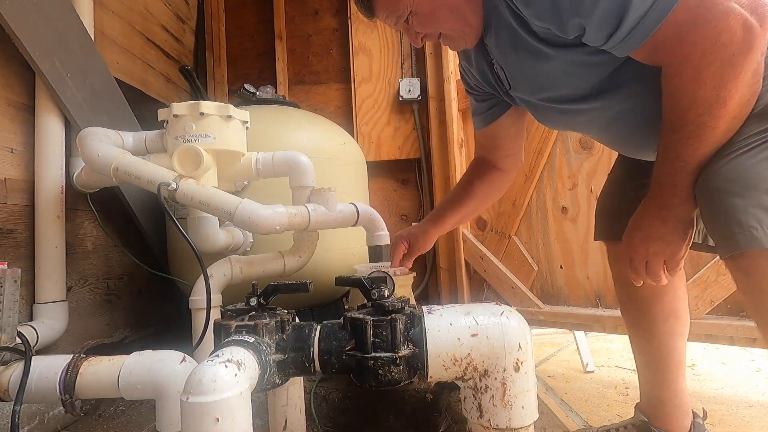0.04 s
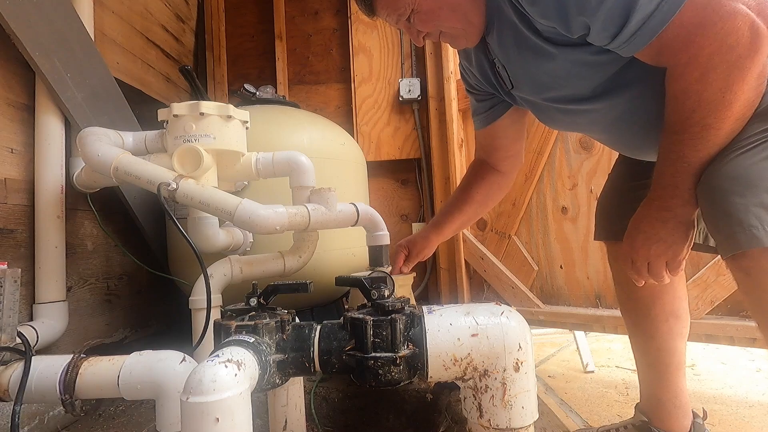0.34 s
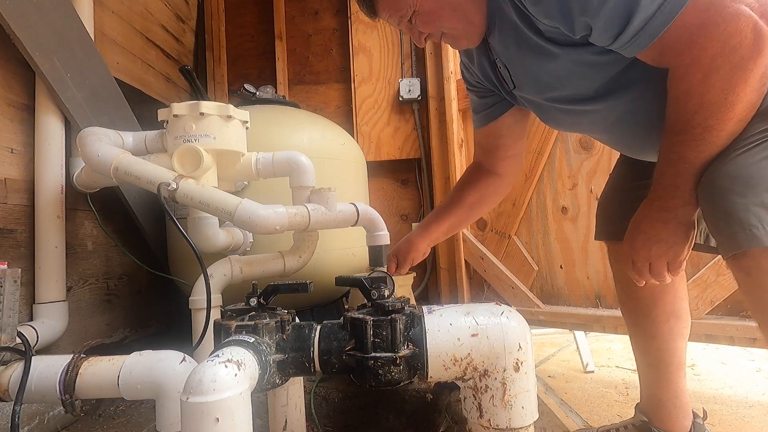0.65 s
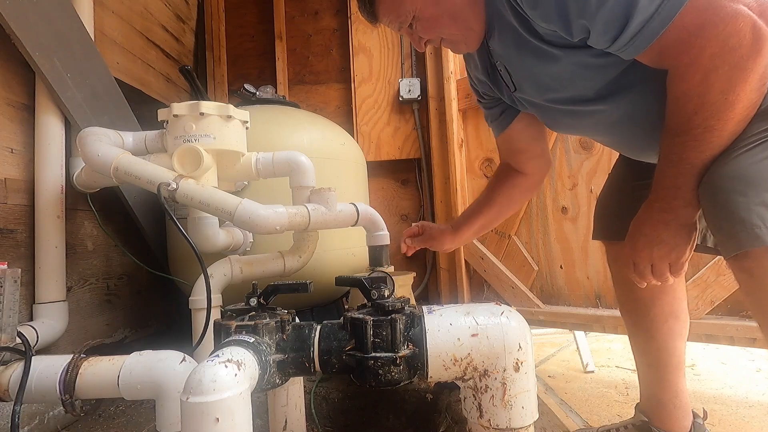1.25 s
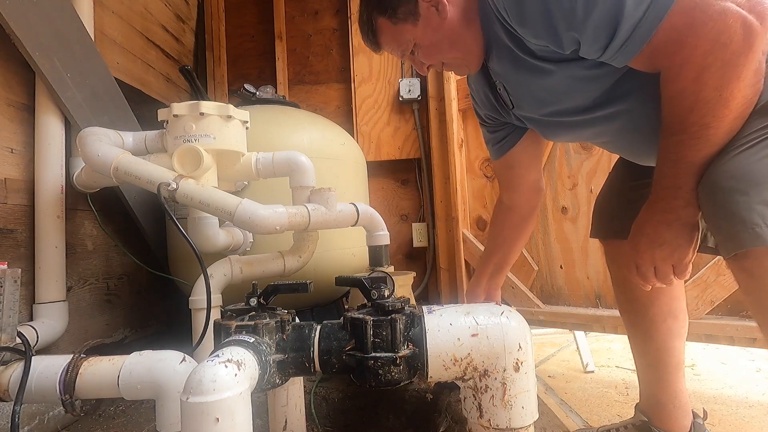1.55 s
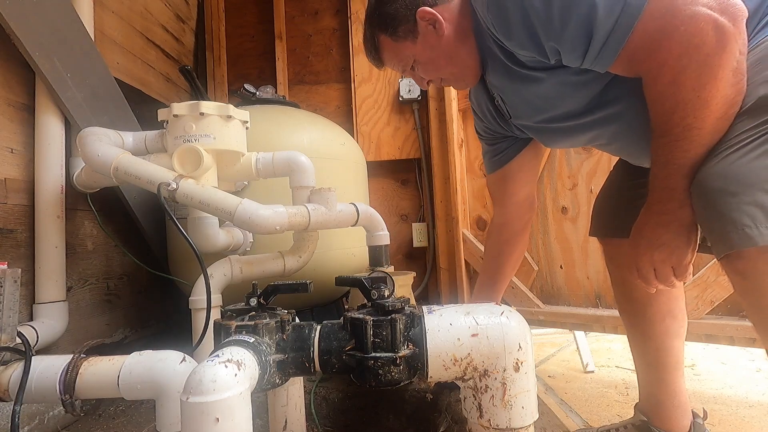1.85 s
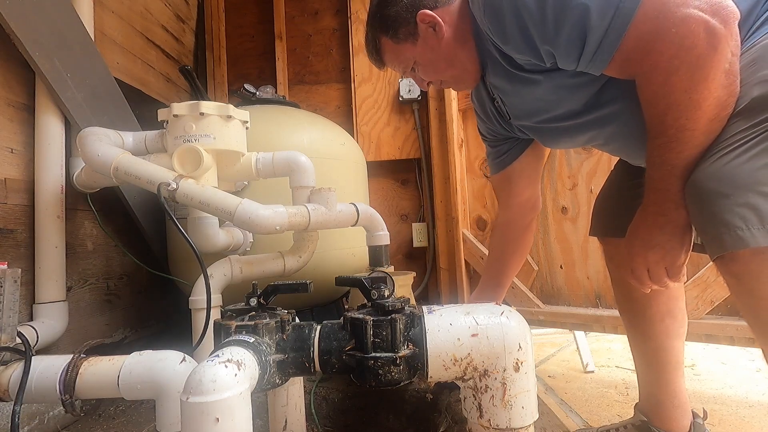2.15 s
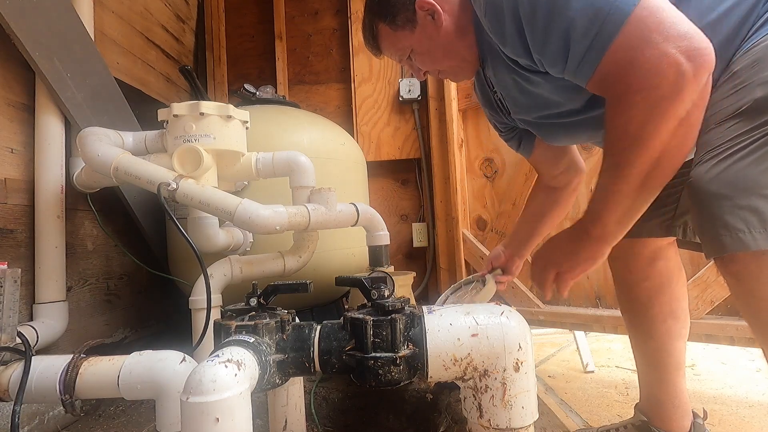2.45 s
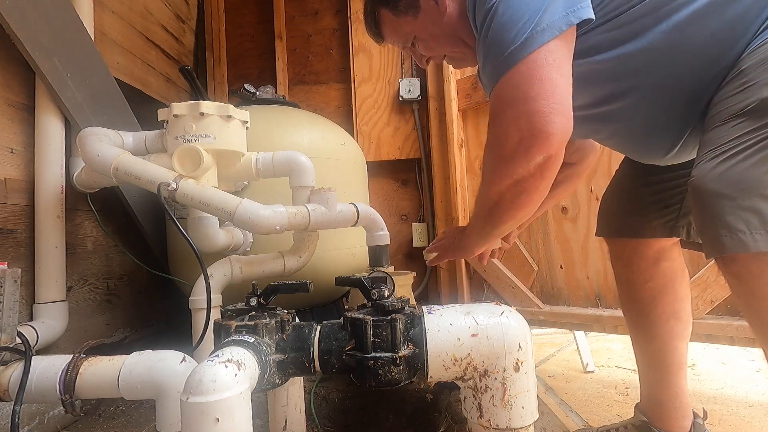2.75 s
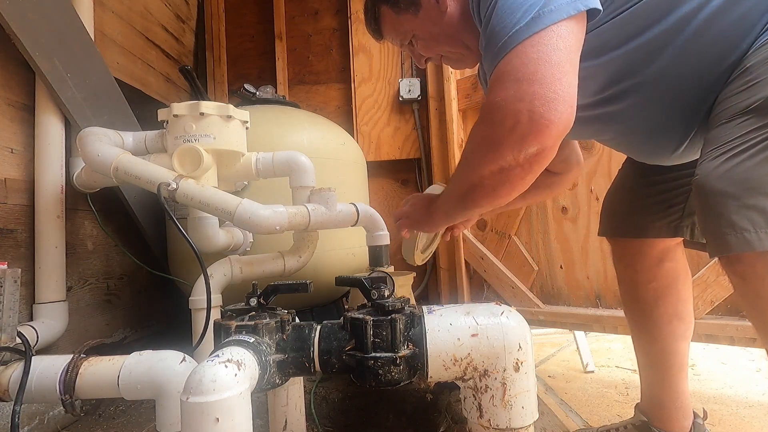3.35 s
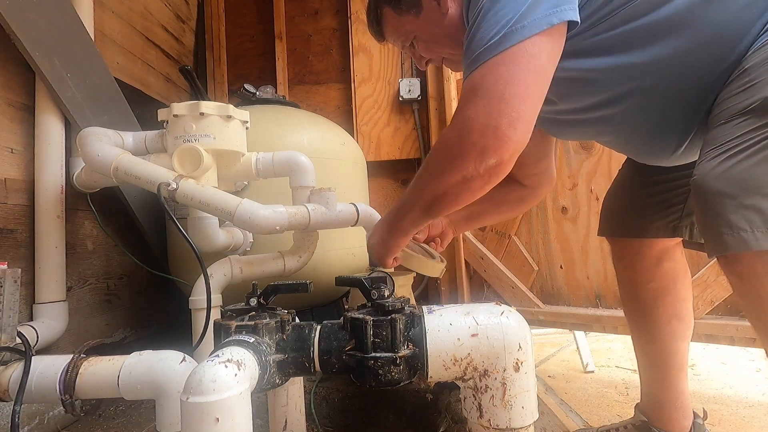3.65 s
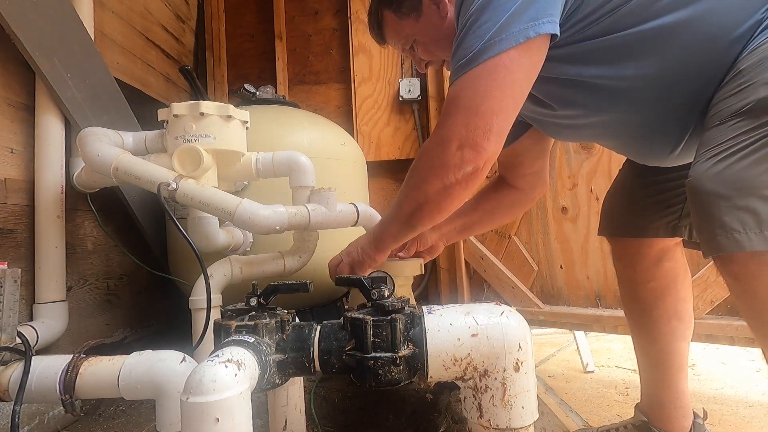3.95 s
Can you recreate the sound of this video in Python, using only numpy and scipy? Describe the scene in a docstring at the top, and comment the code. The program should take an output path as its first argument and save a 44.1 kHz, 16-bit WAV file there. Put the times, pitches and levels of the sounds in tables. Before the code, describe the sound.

Hollow, bubbly gurgling runs throughout from a draining pool pump, heard nearby in a wooden shed with light spatter and a faint rumble. In the second half, a plastic strainer lid knocks briefly twice as it is handled.

```python
"""In a wooden shed, air gulps into the draining pipes of a stopped pool pump.
Each gulp is a clump of bubbles ringing at their natural frequencies, with a fine spatter above.
Big air pockets glug low in the pipe and excite its air modes, over a soft rumble and wash.
The plastic strainer lid knocks and rattles as it is lifted off and handled."""
import sys
import numpy as np
from scipy import signal
from scipy.io import wavfile

SR = 44100
rng = np.random.default_rng(int(sys.argv[2]) if len(sys.argv) > 2 else 0)


def store_wav(level_fs):
    """Save 16-bit WAV to argv[1]."""
    pcm = np.round(np.clip(np.atleast_2d(level_fs), -1, 1) * 32767)
    wavfile.write(sys.argv[1], SR, pcm.T.astype(np.int16))


N = 176400


def amp(db):
    """The decibel scale: amplitude grows tenfold every 20 dB."""
    return 10 ** (np.asarray(db) / 20)


def rms(x):
    """Effective amplitude: the root of the mean square."""
    return np.sqrt(np.mean(x ** 2) + 1e-20)


def read(points, hz):
    """Interpolation of a table on a logarithmic frequency axis."""
    table_hz, value = np.transpose(points)
    return np.interp(np.log(hz + 1), np.log(table_hz + 1), value)


def add(mix, start_s, sound):
    """Superposition: a sound sums into the mix from start_s on."""
    part = mix[..., max(round(start_s * SR), 0):][..., :sound.shape[-1]]
    part += sound[..., :part.shape[-1]]


def colour(x, spectrum, tilt_db_per_octave=0):
    """Minimum-phase filtering shapes the spectrum with no sound before the attack."""
    hz = abs(np.fft.fftfreq(x.shape[-1], 1 / SR))
    log_gain = np.log(amp(read(spectrum, hz) + tilt_db_per_octave * np.log2(hz / SR + 1e-3)))
    return np.fft.ifft(np.fft.fft(x) * np.exp(signal.hilbert(log_gain).conj())).real


# Spectrum of the steady background: frequency_hz, density_db
HUSH_SPECTRUM = [(15, -46.5), (55, -11.5), (150, .5), (260, -7), (480, -2.5), (900, -10), (2000, -26),
                 (6000, -38), (12000, -62)]
def hush(level_db=-39):
    """Broadband noise, nearly coherent in both channels: outdoor rumble and draining water."""
    noise = colour(rng.standard_normal((3, N)), HUSH_SPECTRUM)
    stereo = noise[0] + 0.068 * noise[1:]
    return amp(level_db) * stereo / rms(stereo)


# Reverberation time of the shed: frequency_hz, t60_s
SHED_DECAY = [(150, 0.71), (500, 0.26), (4000, 0.23), (12000, 0.13)]
# Left-right likeness of its reflections: frequency_hz, coherence
SHED_COHERENCE = [(400, 0.96), (1300, 0.46)]
def shed(wet_db, build_s=0.00062, size=16384):
    """Reverberation: a direct impulse, then dense reflections that decay exponentially."""
    t = np.arange(size) / SR
    echoes = rng.standard_normal((3, size)) * (rng.random((3, size)) < .08)
    hz, frame_s, spectra = signal.stft(echoes, SR, nperseg=256)
    coherence = np.clip(read(SHED_COHERENCE, hz), 0, 1)[:, None]
    stereo = np.sqrt(coherence) * spectra[0] + np.sqrt(1 - coherence) * spectra[1:]
    decay = np.exp(-np.log(1000) * frame_s / read(SHED_DECAY, hz)[:, None])
    tail = signal.istft(stereo * decay, SR, nperseg=256)[1][:, :size]
    tail *= 1 - np.exp(-t / build_s)
    return amp(wet_db) * tail / np.linalg.norm(tail[0]) + (t == 0)


# Spectrum of the struck plastic shell: frequency_hz, density_db
SHELL_SPECTRUM = [(60, -39), (500, -8.5), (950, 0.5), (1900, -4), (2600, -6), (4300, -8), (5600, -17.5),
                  (8500, -30.5), (13000, -55)]
# Knocks and scrapes of the lid: start_s, relative_level_db, chatter_s, tilt_db_per_octave
LID_KNOCKS = [(2.574, -20.5, 0.0024, 2.5), (2.586, -12, 0.016, 1.5), (2.641, -12, 0.0054, 5.5),
              (3.818, -40.5, 0.04, 9), (3.872, -12.5, 0.0051, .5), (3.902, -23.5, 0.006, 0),
              (3.972, -18, 0.0024, -3)]
def lid(contacts_per_s=5000, size=4096):
    """Impact excitation: quick contacts with the pot shake a heavily damped plastic shell."""
    out, t = np.zeros((2, N)), np.arange(size) / SR
    for start_s, level_db, chatter_s, tilt in LID_KNOCKS:
        contacts = rng.standard_normal(size) * (rng.random(size) < contacts_per_s / SR)
        envelope = t / chatter_s * np.exp(-(t / chatter_s) ** 2)
        clack = colour(contacts * envelope, SHELL_SPECTRUM, tilt)
        heard = signal.fftconvolve(clack[None], shed(wet_db=3, build_s=0.0023), axes=1)
        add(out, start_s, amp(level_db - 1.5) * heard / rms(heard[:, :SR // 40]))
    return out


# Air modes of the pipe and strainer pot: frequency_hz, relative_level_db
PIPE_MODES = [(376, 3), (447, 2), (550, -3), (690, 0), (820, 1), (965, -2), (1127, -3), (1284, -5),
              (1411, -4), (1565, -5), (1925, -2)]
def pipe(x, ring_db, bandwidth_hz=43.2):
    """Modal resonance: the enclosed air rings on, decaying at a rate set by its bandwidth."""
    t = np.arange(SR // 5) / SR
    modes = sum(amp(db) * np.cos(2 * np.pi * hz * t) for hz, db in PIPE_MODES)
    ring = modes * np.exp(-np.pi * bandwidth_hz * t) * 2 * np.pi * bandwidth_hz / SR
    return signal.fftconvolve(x, (t == 0) + amp(ring_db) * ring)


# Big air pockets: peak_s, relative_level_db
AIR_POCKETS = [(.229, -10.5), (.398, -12), (.459, -9), (.491, -6.5), (.692, -6.5), (.716, -9.5),
               (.89, -8.5), (.939, -6.5), (.981, -12.5), (1.106, -5), (1.136, -11.5), (1.16, -9.5),
               (1.324, -11.5), (1.369, -6.5), (1.425, -9.5), (1.446, -9.5), (1.472, -4), (1.586, -8),
               (1.819, -11.5), (1.949, -6.5), (1.991, -19), (2.084, -13.5), (2.217, -5.5), (2.253, -7),
               (2.285, -5.5), (2.303, -13.5), (2.372, -14.5), (2.659, -9), (2.765, -12.5), (3.279, -10),
               (3.393, -11.5), (3.465, -7), (3.506, -7), (3.631, -6), (3.662, -4.5), (3.791, -13.5)]
def glugs(centre_hz=486, rise_per_s=0.52, swell_s=0.0062, fade_s=0.0048, lead_s=.04):
    """Volume oscillation: a big air pocket swells, pulsates at its own pitch and closes."""
    out = np.zeros(N)
    t = np.arange(SR // 10) / SR - lead_s
    envelope = 1 / (np.exp(-t / swell_s) + np.exp(np.minimum(t / fade_s, 20))) ** 2
    for peak_s, level_db in AIR_POCKETS:
        pitch_hz = centre_hz * (1 + .06 * rng.uniform(-1, 1))
        tone = np.sin(2 * np.pi * (pitch_hz * t * (1 + rise_per_s * t / 2) + rng.random()))
        glug = pipe(envelope * tone, ring_db=2)
        add(out, peak_s - lead_s, amp(level_db - 2) * glug / abs(glug).max())
    return signal.fftconvolve(out[None], shed(wet_db=-9), axes=1)[:, :N]


def bubble(pitch_hz, cycles, rise=0.0035, size=2048):
    """Damped oscillation: a bubble swells within a few cycles and dies away as its pitch creeps up."""
    age = np.arange(size) / SR * pitch_hz / cycles
    envelope = age ** 2 * np.exp(-age * np.sqrt(2))
    return envelope * np.sin(2 * np.pi * cycles * age * (1 + rise * age))


def clump(length_s, pitch_hz, cycles, follower_db, per_s=520, scatter=0.303, sag=0, count=70):
    """Bubble pitch falls with size: a crowd follows a leader, with sag making later ones larger."""
    out = np.zeros(int(length_s * SR) + 4096)
    jitter = rng.random(count)
    detune = rng.uniform(-2.081, 2.066, count)
    strength = np.clip(rng.standard_normal(count), -2, 2)
    add(out, 0, bubble(pitch_hz, cycles))
    for k in range(1, min(count, int(length_s * per_s) + 1)):
        start_s = (k - jitter[k]) / per_s
        follower_hz = pitch_hz * np.exp(scatter * detune[k] - sag * (start_s / length_s - .5))
        add(out, start_s, amp(follower_db + 2 * strength[k]) * bubble(follower_hz, cycles))
    return out


# Prominent bubbles: start_s, pitch_hz, relative_level_db
LOUD_BUBBLES = [(.031, 703, -24), (.073, 5600, -36.5), (.129, 6460, -33), (.272, 794, -16),
                (.355, 833, -23), (.468, 4320, -22.5), (.965, 1568, -8.5), (1.081, 2540, -15.5),
                (1.091, 4030, -20.5), (1.312, 720, -16.5), (1.541, 758, -13.5), (1.767, 825, -8.5),
                (1.796, 830, -17.5), (1.802, 5400, -29), (1.878, 1117, -14), (2.03, 7100, -32),
                (2.178, 820, -13.5), (3.008, 730, -25), (3.234, 2030, -18.5)]
def plinks():
    """Bubble break-up: one rings out above the rest and splits into a few of like size."""
    out, room = np.zeros((2, N)), shed(wet_db=1)
    for start_s, pitch_hz, level_db in LOUD_BUBBLES:
        plink = clump(.014, pitch_hz, cycles=4, follower_db=-10, scatter=.11)
        heard = signal.fftconvolve(plink[None], room, axes=1)
        add(out, start_s, amp(level_db) * heard / abs(heard).max())
    return out


# Spectrum of the spray: frequency_hz, density_db
SPATTER_SPECTRUM = [(900, 1.5), (2400, 4), (4300, -4.5), (5600, -10.5), (7800, -15.5), (12500, -35.5)]
def spatter(length_s, ring_s=.003, range_db=24, fizz_per_s=7000, linger=.4, size=12000, count=56):
    """Shot noise: tiny bubbles ring at random over a dense fizz; both briefly outlast the gulp."""
    pops, t = np.zeros(size), np.arange(size) / SR
    span_s = length_s * (1 + 2 * linger)
    for when, height, softness in rng.random((count, 3)):
        pitch_hz = 1700 * 6.5 ** height
        envelope = np.exp(-t / ring_s) * (1 - np.exp(-t * pitch_hz / 2))
        add(pops, when * span_s, amp(-range_db * softness) * envelope * np.sin(2 * np.pi * pitch_hz * t))
    fizz = rng.standard_normal(size) * (rng.random(size) < fizz_per_s / SR) * (t < span_s)
    fade = np.exp(-np.maximum(t - length_s, 0) / (linger * length_s))
    return colour(fade * (pops / rms(pops) + amp(-3) * fizz / rms(fizz)), SPATTER_SPECTRUM)


# Gulps of air: start_s, length_s, pitch_hz, relative_level_db, relative_spatter_db
AIR_GULPS = [(.212, 0.035, 1340, -32.5, -37.5), (.261, 0.0056, 1350, -45, -18.5),
             (0.272, 0.047, 876, -16.5, -34), (.348, 0.047, 1140, -18.5, -35),
             (0.43, 0.046, 786, -15, -40.5), (.484, 0.02, 937, -22, -35), (0.549, 0.042, 776, -17, -40),
             (0.608, .031, 886, -18, -35.5), (0.671, 0.066, 895, -20, -40), (0.798, .054, 1450, -19.5, -34),
             (0.87, 0.06, 1036, -15, -33.5), (0.965, 0.08, 1245, -26, -37), (1.082, 0.032, 933, -16, -37),
             (1.163, 0.061, 1053, -27, -40.5), (1.273, 0.045, 1010, -20, -52),
             (1.307, 0.029, 828, -19, -35.5), (1.36, 0.072, 932, -22, -35),
             (1.453, 0.036, 1240, -18.5, -36.5), (1.537, 0.037, 870, -18.5, -32.5),
             (1.602, 0.078, 854, -19, -38.5), (1.764, 0.05, 954, -16, -36.5),
             (1.921, 0.029, 748, -17.5, -38.5), (2.057, 0.074, 961, -16.5, -28.5),
             (2.177, 0.072, 812, -15.5, -31), (2.259, 0.037, 1012, -17, -28.5),
             (2.422, .036, 850, -27.5, -42.5), (2.486, 0.029, 1180, -20, -43),
             (2.703, 0.029, 1186, -18, -39), (2.745, .025, 987, -20, -37), (2.895, 0.022, 908, -20, -52),
             (2.946, 0.049, 1300, -24, -46.5), (3.008, 0.061, 897, -19, -32),
             (3.165, 0.05, 1340, -19, -37.5), (3.259, 0.028, 1190, -15.5, -52),
             (3.295, 0.027, 730, -17.5, -40), (3.374, 0.062, 1140, -14, -32),
             (3.438, 0.035, 874, -20, -34.5), (3.495, 0.023, 996, -21, -34),
             (3.538, 0.027, 980, -20.5, -27.5), (3.568, .065, 788, -15.5, -28),
             (3.65, 0.023, 747, -14, -34), (3.738, 0.13, 910, -24, -37)]
def gulps(slosh_hz=348.4, slosh_db=-12):
    """Source and resonator: bubbles and a low slosh ring the pipe while surface spray crackles."""
    out, room = np.zeros((2, N)), shed(wet_db=-2.5)
    for start_s, length_s, pitch_hz, level_db, spatter_db in AIR_GULPS:
        body = pipe(clump(length_s, pitch_hz, cycles=1.62, follower_db=-5, sag=.25), ring_db=13)
        slosh = pipe(clump(length_s, slosh_hz, cycles=1, follower_db=-3, per_s=260), ring_db=23)
        spray = spatter(length_s)
        for sound, db in ((body, level_db), (slosh, level_db + slosh_db), (spray, spatter_db)):
            heard = signal.fftconvolve(sound[None], room, axes=1)
            add(out, start_s, amp(db - 2.5) * heard / rms(heard[:, :int(length_s * SR)]))
    return out


def scene():
    """Level difference between channels sets the water a little to the left, the lid near the middle."""
    water = (gulps() + plinks()) * amp([[.5], [-.5]]) + glugs() * amp([[.7], [-.7]])
    return water + lid() + hush()


def record(dry, cutoff_hz=14200):
    """Band limiting: a linear-phase low-pass filter removes the highest treble."""
    lowpass = signal.firwin(255, cutoff_hz, window=("kaiser", 8), fs=SR)
    return signal.oaconvolve(dry, lowpass[None], "same")


dry = scene()
out = record(dry)
store_wav(out)
```